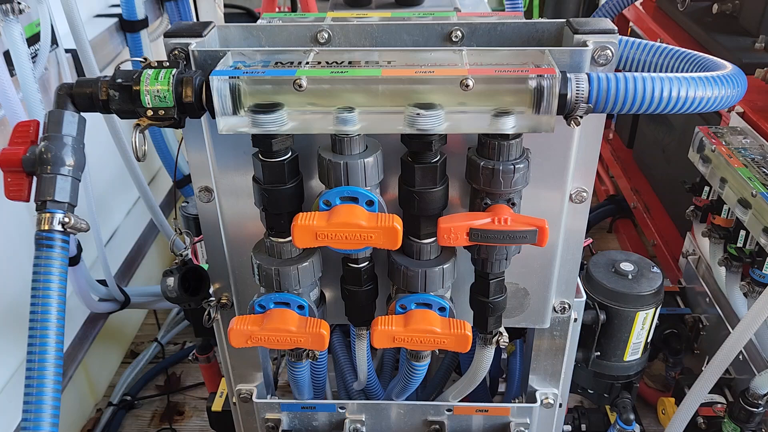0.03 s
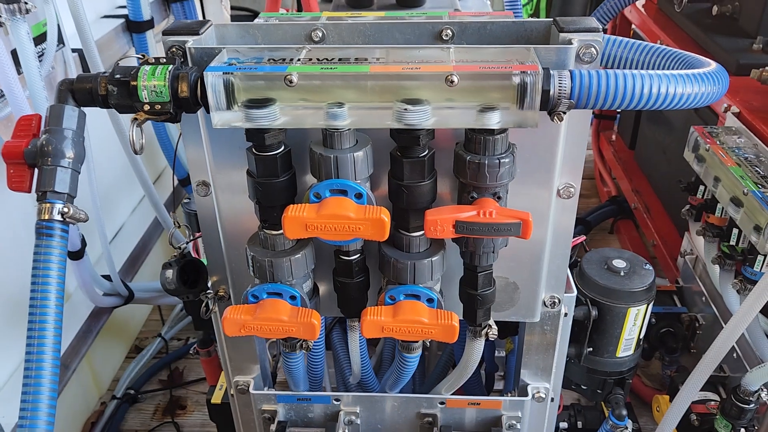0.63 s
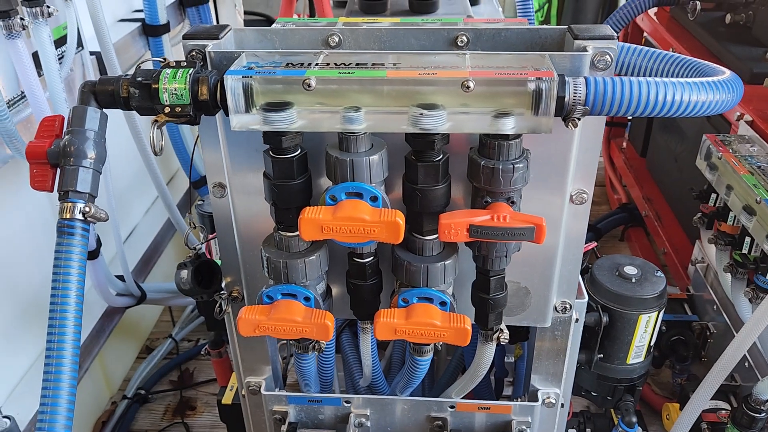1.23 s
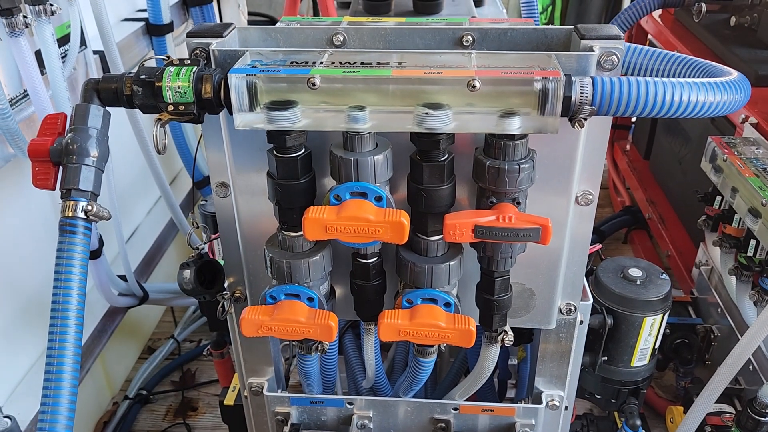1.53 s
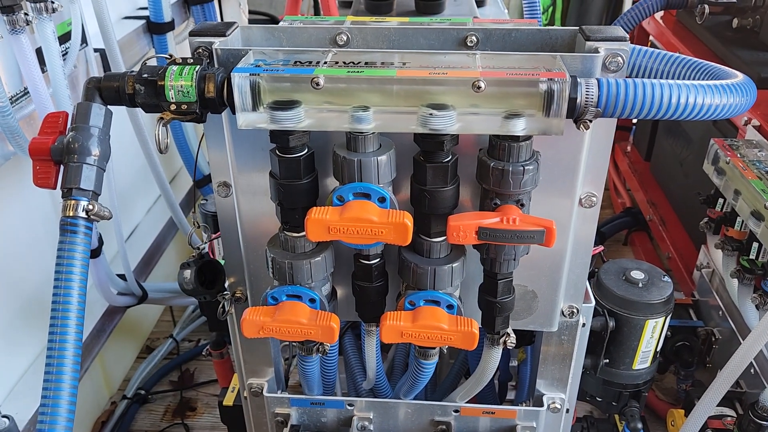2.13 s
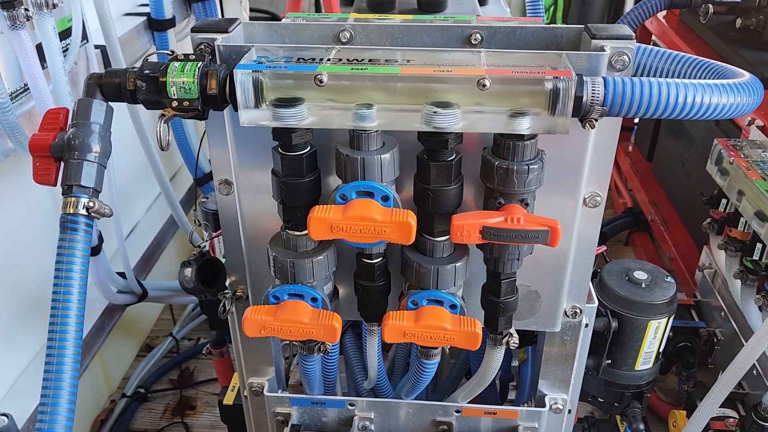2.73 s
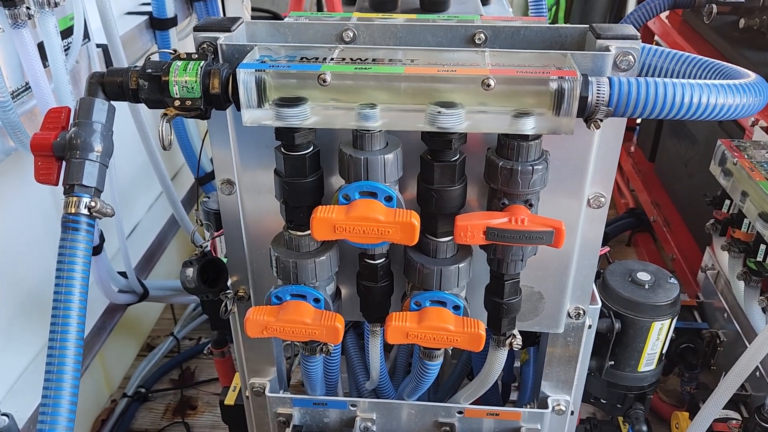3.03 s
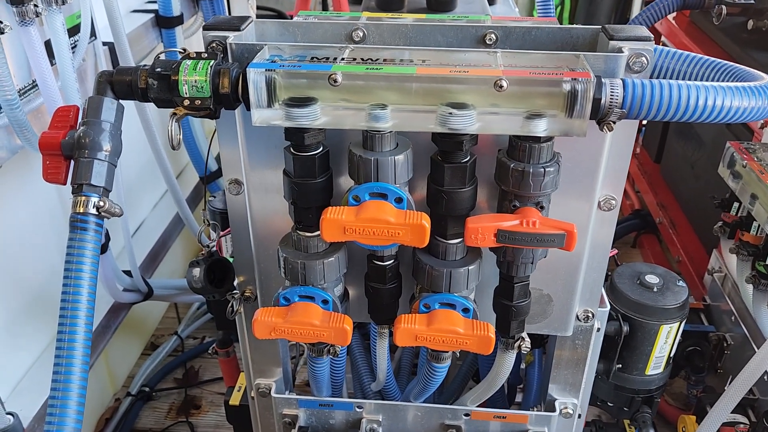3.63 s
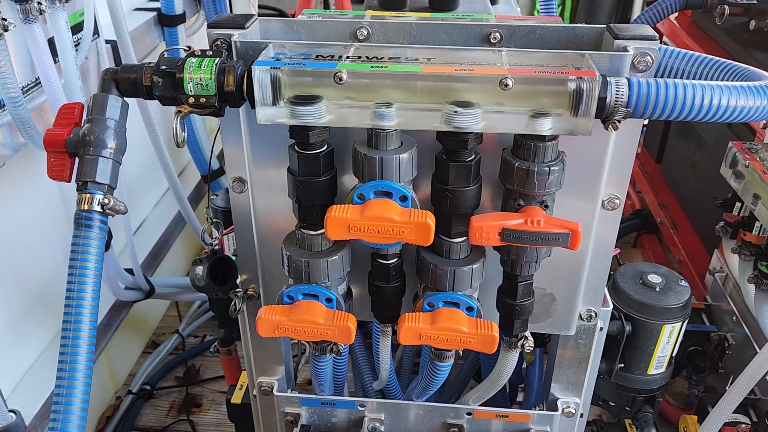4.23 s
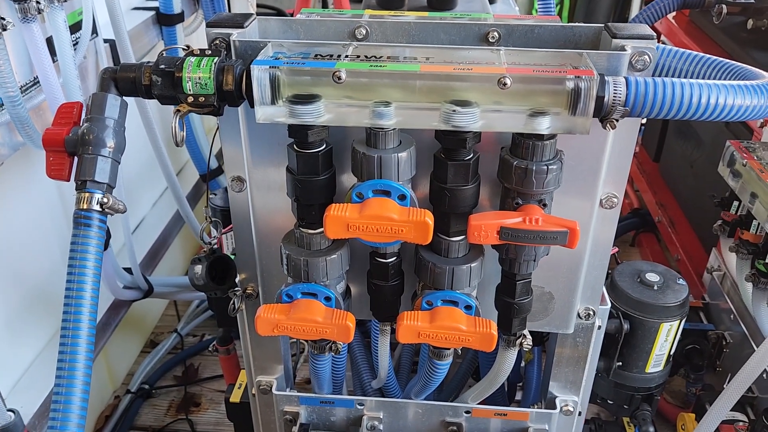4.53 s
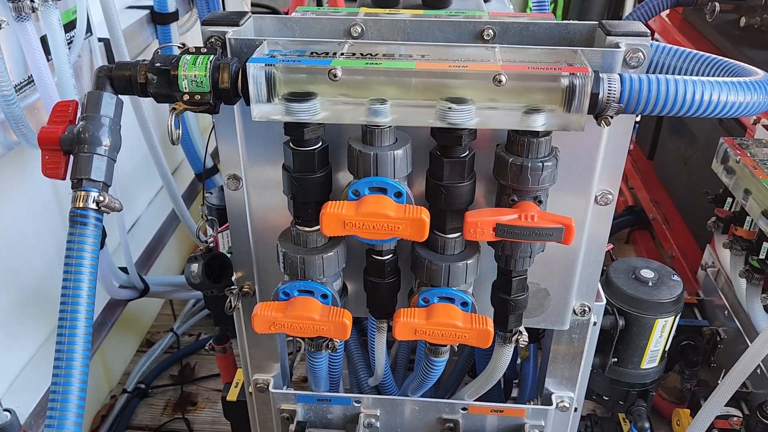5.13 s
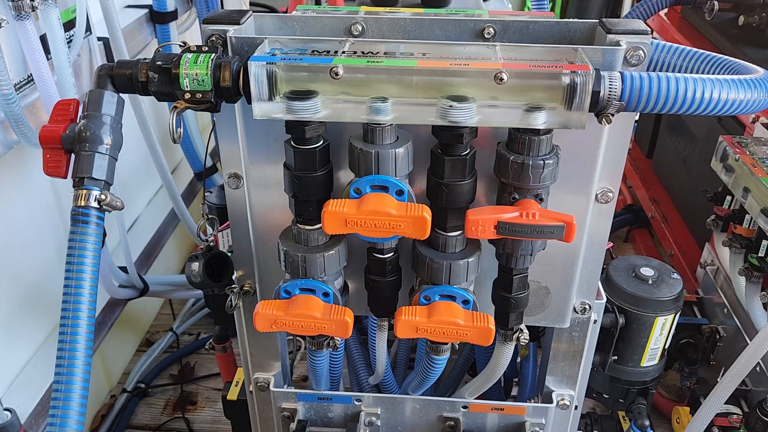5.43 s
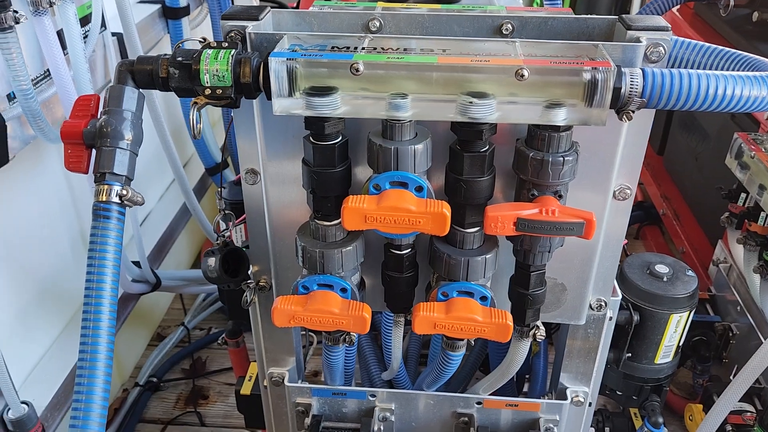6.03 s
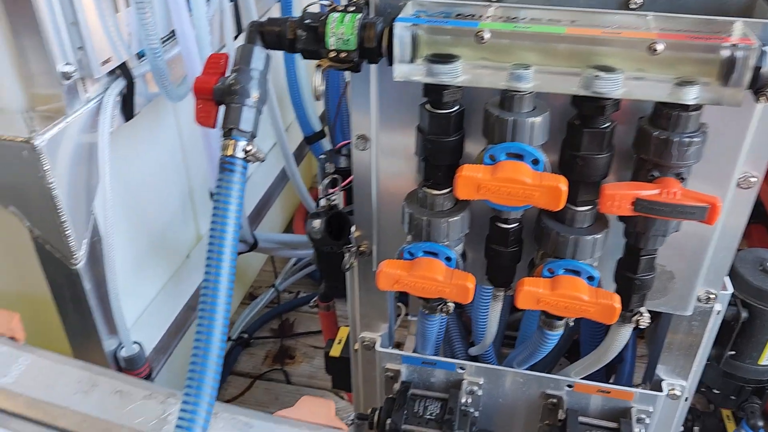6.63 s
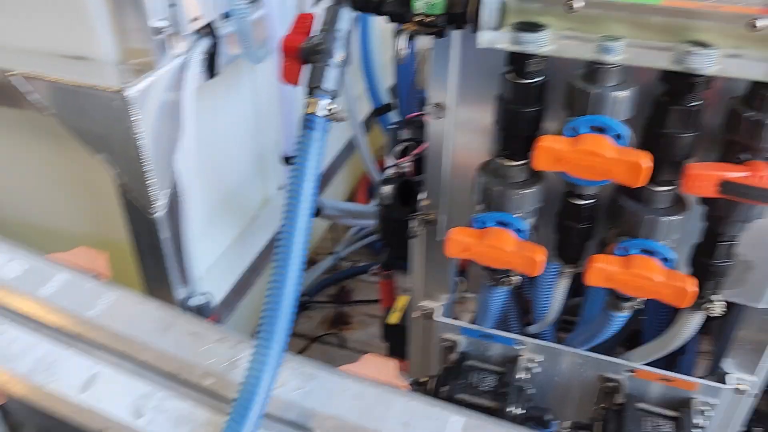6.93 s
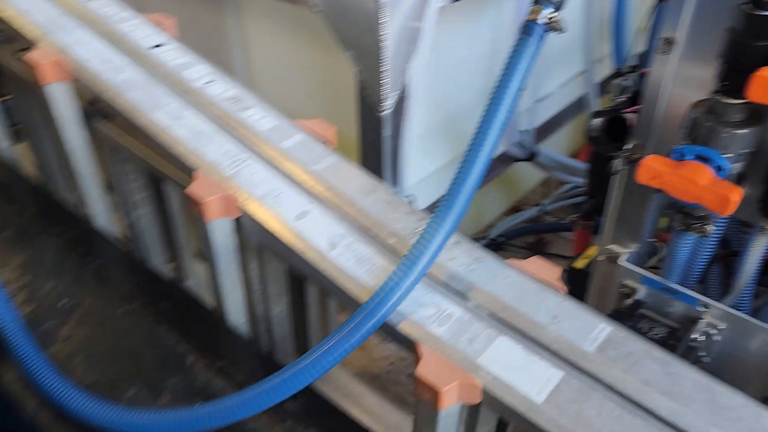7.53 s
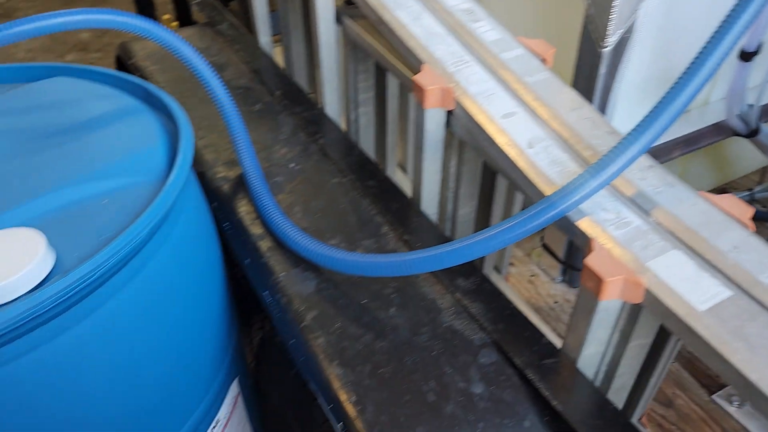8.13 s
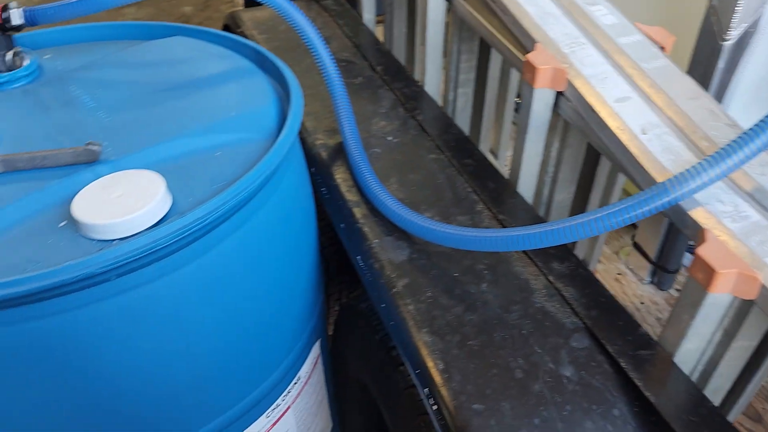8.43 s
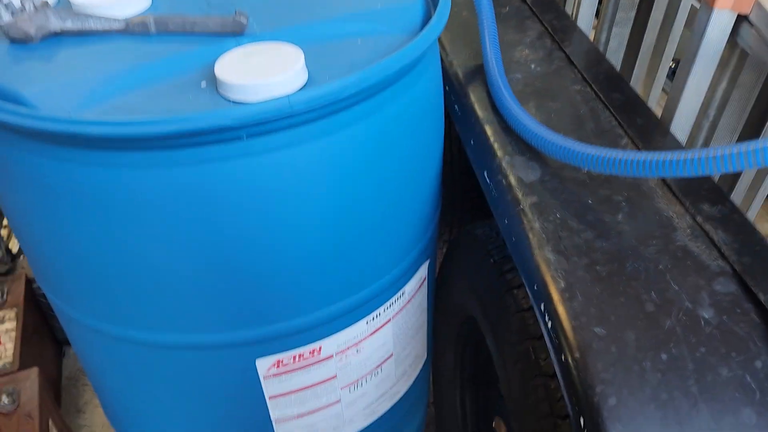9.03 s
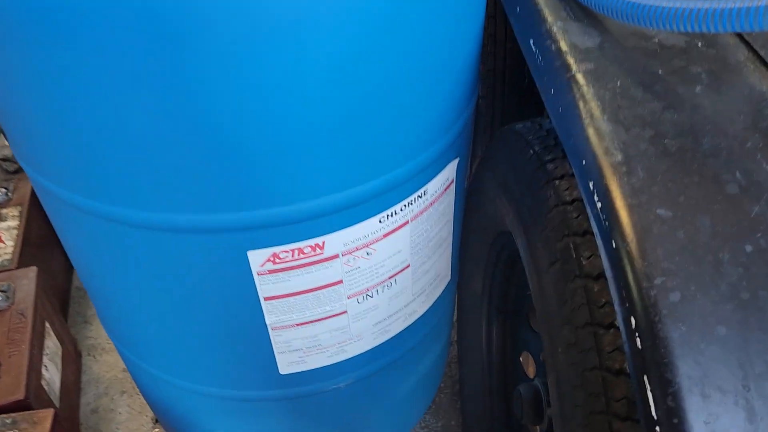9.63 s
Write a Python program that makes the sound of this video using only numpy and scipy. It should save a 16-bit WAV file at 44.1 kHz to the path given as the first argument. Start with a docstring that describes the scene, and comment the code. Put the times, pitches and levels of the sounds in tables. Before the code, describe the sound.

A small engine driving a transfer pump is heard from the very start, close by in a work trailer, and runs at one steady speed for about ten seconds. Its rapid firing makes a buzzing, throbbing drone, with a metallic casing rattle, quick light valve ticks and a thin high ring on top. A fine hiss pulses with it and the floor rumbles underneath. Little changes until about 6.5 seconds, when the microphone turns and moves a few steps away. The ticking softens, the ring fades out and the drone shifts in tone, with different midrange notes swelling and dipping, though it stays about as present. Between about 7.7 and 8.1 seconds, shoes make several short scuffs on the gritty floor. A slightly longer heel scrape follows around 9.5 seconds, with the engine still running to the end.

```python
"""A small four-stroke engine drives a transfer pump at steady speed in a chemical mixing trailer.
Its firings drone through exhaust and trailer resonances and shake the casing once a cycle.
Valve gear ticks and rings a thin cover, a fine sizzle pulses, and the floor rumbles.
The listener stands at the valve panel, then turns away and walks through standing waves to a drum,
shoes scuffing on the gritty floor."""
import sys
import numpy as np
from scipy import signal
from scipy.fft import rfft, irfft, next_fast_len
from scipy.io import wavfile
from scipy.ndimage import uniform_filter1d, map_coordinates

SR = 44100
rng = np.random.default_rng(int(sys.argv[2]) if len(sys.argv) > 2 else 0)


def dump_mix(stems):
    """Bounce the given channels to the path in sys.argv[1] as a 16-bit WAV at rate SR."""
    frames = np.atleast_2d(stems).T  # one column per channel
    limited = np.clip(frames, -1, 1)  # hard clip at full scale
    pcm = np.round(limited * 32767).astype(np.int16)
    wavfile.write(sys.argv[1], SR, pcm)


N = 435266
CYCLE_HZ = 32.903
TURN_M, DRUM_M = 0.96, 1.6  # from the panel: turn complete, drum


def amp(db):
    """Decibels to gain."""
    return 10 ** (np.asarray(db) / 20)


def unit(x):
    """x at rms 1."""
    return x / np.sqrt(np.mean(x ** 2) + 1e-20)


def bell(offset, half_width):
    """Gaussian of height 1, down to 1/e at half_width."""
    return np.exp(-(offset / half_width) ** 2)


def at_hz(points, hz):
    """(Hz, value) points interpolated on a log axis."""
    freqs, values = np.transpose(points)
    return np.interp(np.log(hz + 1), np.log(freqs + 1), values)


def timeline(points):
    """(seconds, value) points interpolated per sample."""
    times_s, values = np.transpose(points)
    return np.interp(np.arange(N) / SR, times_s, values)


def wobble(rate_hz):
    """Smooth random curve, rate_hz knots a second."""
    knots = rng.standard_normal(4096)
    return map_coordinates(knots, [np.arange(N) * rate_hz / SR], mode="wrap")


def filtered(x, response):
    """x through a frequency response."""
    size = next_fast_len(N + SR // 4)
    return irfft(rfft(x, size) * response(np.fft.rfftfreq(size, 1 / SR)), size)[..., :N]


# Each row: frequency in Hz, coherence between the ears.
EAR_COHERENCE = [(60, 0.98), (160, 0.99), (300, 0.95), (640, 0.87), (1400, 0.58), (3100, 0.037),
                 (7000, 0.029)]
def ears(pair, colour_db):
    """Two independent signals to coloured stereo at rms 1, coherent in the bass."""
    def response(hz):
        angle = np.arccos(np.clip(at_hz(EAR_COHERENCE, hz), -1, 1)) / 2
        return amp(colour_db(hz)) * [np.cos(angle), np.sin(angle)]
    mid, side = filtered(pair, response)
    return unit(np.array([mid + side, mid - side]))


def engine_cycles(wander=0.01094, hunt=0.0011, jitter=0.00018):
    """Cycles turned so far; speed wanders, hunts and varies per firing. Depths in cycles."""
    steady = CYCLE_HZ * np.arange(N) / SR
    return steady + wander * wobble(.7) + hunt * wobble(6) + jitter * wobble(CYCLE_HZ)


# Harmonics between resonances. Each row: frequency in Hz, level at the panel in dB.
OVERTONES = [(240, -67), (400, -61.5), (560, -61.5), (760, -65.5), (990, -62.5), (1090, -70), (1240, -64),
             (1480, -60), (1820, -67.5), (1950, -62.5), (2270, -63.5), (2500, -69.5), (3000, -68.5),
             (3650, -72)]
# Each row: frequency in Hz, fade of those harmonics in dB per m.
OVERTONE_FADE = [(350, 1.5), (700, -2), (1100, 1), (1600, 2), (2200, -1.5), (3300, -1.5)]
# Exhaust and trailer modes. Each row: centre in Hz, half width in Hz, panel level in dB, fade in dB/m.
DRONE_MODES = [(159.9, 19.5, -34.5, 4), (193.8, 15.6, -44.8, -0.5), (307.5, 22.4, -51.5, 0.5),
               (349, 24.2, -46, 5), (502.6, 34, -56.5, 3.5), (592, 17, -52, 3), (625.7, 25.4, -39, 9),
               (667.9, 32.8, -44, 6), (724, 15, -52.5, 7), (790, 18, -53.5, .5), (823, 16, -54, 14),
               (918, 52, -47.5, 7), (1009, 50, -56.5, 0), (1166.5, 32, -46.5, 8), (1349, 15, -56, 1),
               (1415, 14, -55, 6), (1490, 35, -57.5, 14), (1610, 24, -60, 2), (1710, 30, -53, 6),
               (2008, 42, -48, 13), (2105, 16, -56, 6), (2165, 34, -51, 5), (2745, 28, -61, 7),
               (2895, 14, -57.5, 7), (3060, 14, -61.5, 4), (3126, 14, -63, 8)]
# Standing-wave peaks. Each row: distance in m, half length in m, centre in Hz, half width in Hz,
# level in dB.
ANTINODES = [(.2, .24, 2310, 85, -54), (.3, .18, 1710, 25, -57), (.9, .4, 527, 18, -52.5),
             (2.35, .9, 527, 17, -48.5), (2.5, 2.1, 625, 15, -43.5), (2.3, .4, 658, 16, -53),
             (1.5, .9, 823, 18, -45.7), (2.2, 1.4, 855, 16, -53.5), (2.1, 1, 395, 20, -57),
             (1.4, 1.2, 1316, 20, -57), (2.4, .6, 1200, 60, -62), (1.5, .9, 2310, 90, -58),
             (1.3, .35, 2160, 34, -52.5), (1.95, .28, 2130, 28, -47.5), (2.35, .33, 2171, 21, -43.5),
             (1.4, .3, 2402, 18, -57), (2.4, .3, 2895, 23, -60), (1.3, .3, 3060, 18, -60),
             (1.55, .5, 3556, 22, -64.5)]
# Standing-wave dips. Each row: distance in m, half length in m, centre in Hz, half width in Hz,
# gain in dB.
NODES = [(.6, .35, 625, 20, -3.5), (1.5, .55, 724, 22, -13), (2, .25, 362, 20, -7),
         (1.35, .45, 1090, 25, -6), (1.45, .4, 1440, 75, -7), (1.5, .3, 2050, 60, -7),
         (1.75, .25, 2950, 400, -3)]
def harmonic_gains(hz, distance_m):
    """Resonances change with distance from the panel; standing waves add and cancel locally."""
    power = amp(at_hz(OVERTONES, hz) - at_hz(OVERTONE_FADE, hz) * distance_m) ** 2
    for centre_hz, half_hz, db, fade_db_per_m in DRONE_MODES:
        power += (amp(db - fade_db_per_m * distance_m) * bell(hz - centre_hz, half_hz)) ** 2
    for place_m, half_m, centre_hz, half_hz, db in ANTINODES:
        power += (amp(db) * bell(distance_m - place_m, half_m) * bell(hz - centre_hz, half_hz)) ** 2
    dips_db = sum(db * bell(distance_m - place_m, half_m) * bell(hz - centre_hz, half_hz)
                  for place_m, half_m, centre_hz, half_hz, db in NODES)
    return np.sqrt(power) * amp(dips_db)


# Target band envelopes at depth 1. Each row: low edge in Hz, high edge in Hz, peak time in cycles,
# swell in dB, knocks per cycle, knock time in cycles, knock in dB.
BAND_SWELLS = [(100, 240, .42, 2, 1, 0, 0), (240, 440, .55, 5, 2, .6, 1.5), (440, 570, .03, 3, 2, .02, 1.5),
               (570, 770, 0, 0, 2, .35, 1.2), (770, 1000, .2, 2.8, 3, .15, 1),
               (1000, 1280, .42, 3, 4, .28, .8), (1280, 1850, .5, 5.5, 7, .33, 1),
               (1850, 2450, .35, 2, 3, .15, 2.5), (2450, 3700, .35, 1.5, 3, .18, 3)]
def firing_phases(orders, start_phases, distance_m, depth, size=256, passes=60):
    """Walls smear each firing: phases are iterated so each band swells and knocks within the cycle."""
    hz, moment = orders * CYCLE_HZ, np.arange(size) / size
    gains, phases = harmonic_gains(hz, distance_m), start_phases.copy()
    for low_hz, high_hz, peak_at, swell_db, knocks, knock_at, knock_db in BAND_SWELLS:
        band = (hz >= low_hz) & (hz < high_hz)
        harmonics = np.exp(2j * np.pi * np.outer(orders[band], moment))
        envelope_db = swell_db * np.cos(2 * np.pi * (moment - peak_at))
        envelope_db += knock_db * np.cos(2 * np.pi * knocks * (moment - knock_at))
        for _ in range(passes):
            wave = (gains * np.exp(1j * phases))[band] @ harmonics
            target = amp(depth * envelope_db) * np.exp(1j * np.angle(wave))
            phases[band] = np.angle(harmonics.conj() @ target)
    return phases


# Each row: frequency in Hz, left minus right at the panel in dB.
PANEL_BALANCE = [(60, -4), (110, 5), (200, -1), (380, 4.5), (700, 3), (1290, -3.5), (2380, -7), (4400, 0.5),
                 (8120, -3), (15000, -0.5)]
# Each row: frequency in Hz, left minus right near the drum in dB.
DRUM_BALANCE = [(60, -9.5), (110, 7), (200, 0.5), (380, 0.5), (700, 0), (1290, 3), (2380, -9), (4400, 19),
                (8120, 0.5), (15000, -2.0)]
def ear_gains(hz, turned, lag_s=0.00035, lag_below_hz=1900):
    """Reflections split the ears' phases; after the turn low orders reach the right ear first."""
    ear = np.array([.5, -.5])[:, None, None]
    scatter_rad = np.arccos(np.clip(at_hz(EAR_COHERENCE, hz), 0, 1)) * rng.choice([-1, 1], len(hz))
    lag_rad = turned * 2 * np.pi * hz * lag_s / (1 + (hz / lag_below_hz) ** 2)
    balance_db = (1 - turned) * at_hz(PANEL_BALANCE, hz) + turned * at_hz(DRUM_BALANCE, hz)
    pair = amp(ear * balance_db) * np.exp(1j * ear * ((1 - 0.61 * turned) * scatter_rad - lag_rad))
    return pair / np.sqrt(np.mean(abs(pair) ** 2, axis=0))


def exhaust_drone(cycles, distance_m, turned, shudder=0.017, flutter_db=0.65,
                  drift_db=2.0, drift_rad=0.66, places=48, size=4096):
    """One firing a cycle: knocking at the panel, smoothed by reflections farther off."""
    orders = np.arange(4, 112)
    hz = orders * CYCLE_HZ
    grid_m = np.linspace(0, distance_m.max(), places)[:, None]
    grid_turned = np.minimum(grid_m / TURN_M, 1)
    near_rad = firing_phases(orders, 2 * np.pi * rng.random(len(orders)), distance_m=0, depth=0.99)
    far_rad = firing_phases(orders, near_rad, DRUM_M, depth=0.34)
    phases = near_rad + grid_turned * np.angle(np.exp(1j * (far_rad - near_rad)))
    drift = unit(uniform_filter1d(rng.standard_normal((2, places, len(orders))), size=12, axis=1))
    drift = drift * grid_turned * np.minimum(hz / 1400, 1)
    gains = harmonic_gains(hz, grid_m) * amp(drift_db * drift[0])
    spectra = np.zeros((2, places, size // 2 + 1), complex)
    spectra[..., orders] = gains * np.exp(1j * (phases + drift_rad * drift[1]))
    spectra[..., orders] *= ear_gains(hz, grid_turned)
    wavetables = irfft(spectra, size) * size / np.sqrt(2)  # one cycle per ear and place
    position = [distance_m / distance_m.max() * (places - 1), cycles % 1 * size]
    drone = np.array([map_coordinates(table, position, order=1, mode="nearest") for table in wavetables])
    upper = filtered(drone, lambda hz: 1 - 1 / (1 + (hz / 700) ** 8))
    flutter = amp(flutter_db * turned * wobble(22))
    return (drone + (flutter - 1) * upper) * (1 + shudder * wobble(45))


def cyclic_noise(cycles, size=8192):
    """Stereo noise that repeats exactly every engine cycle."""
    pattern = signal.resample(rng.standard_normal((2, round(SR / CYCLE_HZ))), size, axis=1)
    grid = np.arange(size) / size
    return unit(np.array([np.interp(cycles % 1, grid, row, period=1) for row in pattern]))


def blows(cycles, at, rise, decay, scatter_db):
    """Envelope of one blow a cycle, random in strength. Times in cycles."""
    since = cycles - at + 1
    age = since % 1
    strength = amp(scatter_db * rng.standard_normal(1024))
    return unit(strength[since.astype(int)] * (1 - np.exp(-age / rise)) * np.exp(-age / decay))


# Each row: frequency in Hz, relative noise density in dB.
CLATTER_SPECTRUM = [(100, -15), (250, -2.5), (470, -5), (800, -1.5), (1100, -3), (1500, 2), (1800, -1),
                    (2350, -4), (2600, -1), (3750, -5), (4600, -4), (6300, -3.5), (6750, -10), (8000, -3.5),
                    (9000, -12.5), (15800, -13)]
# Each row: frequency in Hz, repeating rattle over random rattle in dB.
REPEAT_RATIO = [(2300, -49), (2500, -5), (3400, -9.5), (3800, 2.5), (4400, 0.5), (6000, -2), (8000, -20),
                (14000, -19)]
# Each row: centre in Hz, width in Hz, lift in dB.
CASING_MODES = [(589, 170, 12.5), (930, 120, 1.5), (2135, 160, 7.5), (2990, 63, 4), (4300, 51, 2),
                (4540, 57, -3.5), (7170, 73, 9), (7530, 250, 5)]
def casing_clatter(cycles, turned, level_db=-44.5, shade_db=-4, bright_db=4, throb_db=1.0):
    """Combustion shakes the casing: part of the rattle repeats, part is new each cycle."""
    def colour_db(hz):
        lift_db = sum(db / (1 + (2 * (hz - centre_hz) / width_hz) ** 2)
                      for centre_hz, width_hz, db in CASING_MODES)
        return at_hz(CLATTER_SPECTRUM, hz) + lift_db
    angle = turned * np.pi / 2  # facing away, other reflections carry the rattle
    repeating = np.cos(angle) * cyclic_noise(cycles) + np.sin(angle) * cyclic_noise(cycles)
    repeating = filtered(repeating, lambda hz: amp(at_hz(REPEAT_RATIO, hz)))
    swell = 4 + blows(cycles, at=0.013, rise=0.3, decay=0.95, scatter_db=3.5)
    rattle = ears(swell * (repeating + rng.standard_normal((2, N))), colour_db)
    rattle = filtered(rattle, lambda hz: amp(np.array([[.5], [-.5]]) * at_hz(PANEL_BALANCE, hz)))
    # The body throbs at the panel and drops with the turn.
    body = filtered(rattle, lambda hz: 1 / (1 + (hz / 1900) ** 10))
    body_db = shade_db * turned + throb_db * (1 - turned) * np.cos(2 * np.pi * (cycles - .42))
    # A higher buzz swells early in the turn.
    buzz = filtered(rattle, lambda hz: bell(hz - 2260, 140))
    buzz_db = bright_db * bell(turned - .27, 0.11)
    return amp(level_db) * (rattle + (amp(body_db) - 1) * body + (amp(buzz_db) - 1) * buzz)


# Each row: frequency in Hz, relative noise density in dB.
TICK_SPECTRUM = [(1000, -20), (3000, 0), (3800, -28), (4250, -11), (4700, -21), (5200, -8), (6700, -7),
                 (7600, 3.5), (8700, -14), (15000, -16)]
def valve_ticks(cycles, distance_m, level_db=-51.0, shade_db=-8, shade_m=0.23, grain_db=2, repeat_db=-5):
    """Valve gear chatters once a cycle, partly alike each time; a step aside shades it."""
    grains = rng.standard_normal((2, N)) * amp(grain_db * wobble(1200))
    chatter = grains + amp(repeat_db) * cyclic_noise(cycles)
    ticks = blows(cycles, at=0.17, rise=0.086, decay=0.44, scatter_db=2.5) * chatter
    gain = amp(level_db + shade_db * np.minimum(distance_m / shade_m, 1))
    return gain * ears(ticks, lambda hz: at_hz(TICK_SPECTRUM, hz))


# Each row: tap time in cycles, relative strength in dB.
COVER_TAPS = [(.136, -3), (.26, 0), (.764, -2.5)]
# Each row: centre in Hz, width in Hz, relative gain in dB.
COVER_MODES = [(4210, 78, 4), (4550, 75, 1)]
# Each row: time in seconds, ring level in dB.
COVER_LEVEL = [(0, -61.5), (2.5, -57.5), (4.5, -56), (6.5, -57.5), (7.4, -65), (9.87, -92)]
def cover_ring(cycles, scatter_db=1.2, jitter_s=.000012):
    """Valve gear taps a thin metal cover at set points of the cycle and keeps it ringing."""
    def response(hz):
        return sum((-1) ** i * amp(db) * 1j * hz * width / (centre ** 2 - hz ** 2 + 1j * hz * width)
                   for i, (centre, width, db) in enumerate(COVER_MODES))
    taps, whole_cycles = np.zeros(N), np.arange(1, int(cycles[-1]) - 1)
    for at, db in COVER_TAPS:
        late, strength = rng.standard_normal((2, len(whole_cycles)))
        onsets = np.searchsorted(cycles, whole_cycles + at) + np.round(jitter_s * SR * late).astype(int)
        taps[onsets] += amp(db + scatter_db * strength)
    ear_db = np.array([[1], [-1]])
    return amp(timeline(COVER_LEVEL) + ear_db) * unit(filtered(taps, response))


# Each row: frequency in Hz, relative noise density in dB.
SIZZLE_SPECTRUM = [(2000, -2.5), (6000, -5), (9500, -4.5), (13000, -0.5), (15800, -0.5)]
def sizzle(cycles, level_db=-52.5, grain_db=2.5, flutter_db=1.5):
    """Fine high noise pulses with the engine, equally loud along the walk."""
    grains = rng.standard_normal((2, N)) * amp(grain_db * wobble(1500) + flutter_db * wobble(20))
    pulse = unit(1 + blows(cycles, at=0.079, rise=0.11, decay=0.37, scatter_db=3.0))
    return amp(level_db) * pulse * ears(grains, lambda hz: at_hz(SIZZLE_SPECTRUM, hz))


# Each row: frequency in Hz, relative noise density in dB.
RUMBLE_SPECTRUM = [(18, -7.5), (33, -1.5), (45, -5.5), (62, 1), (80, 1.5), (105, -4), (135, -8),
                   (180, -13.5), (260, -14), (450, -29), (900, -68)]
def floor_rumble(level_db=-44.0, sway_db=1.1, hum_hz=60, hum_db=-54):
    """The trailer floor rumbles unevenly over a low wavering hum."""
    noise = ears(rng.standard_normal((2, N)), lambda hz: at_hz(RUMBLE_SPECTRUM, hz))
    rumble = amp(level_db + sway_db * wobble(7)) * noise
    hum = np.sqrt(2) * np.sin(2 * np.pi * hum_hz * np.arange(N) / SR + .5 * wobble(3.2))
    return rumble + amp(hum_db) * hum


# Each row: centre in seconds, half length in seconds, then sole, grit and heel levels in dB.
SCUFFS = [(7.675, .012, -45, -45, -70), (7.695, .012, -48, -43, -70), (7.74, 0.033, -42, -45.5, -58),
          (7.94, 0.0067, -40, -43, -60), (7.97, 0.022, -45, -45, -60), (8.015, .025, -42, -48, -49),
          (8.061, 0.012, -36, -36, -57), (8.087, 0.018, -33.5, -43, -50), (9.45, 0.069, -44, -45.5, -44.5),
          (9.51, 0.04, -36, -55, -45)]
# Each row, in all three: frequency in Hz, relative noise density in dB.
SOLE_SPECTRUM = [(200, -28), (450, -18), (700, -21), (1200, -11), (1700, -3), (2250, 3.5), (3000, -5),
                 (4200, -9), (8000, -18), (15000, -37)]
GRIT_SPECTRUM = [(800, -31), (2500, -15), (6000, 4.5), (9500, 1.5), (12000, -2), (15500, -0.5)]
HEEL_SPECTRUM = [(200, -22), (450, -13), (700, 1.5), (1100, -7), (1700, -11), (4000, -33)]
def shoe_scuffs(grain_db=2.8):
    """Soles rasp on the floor and crush grit in dense grains; a dragged heel scrapes lower."""
    t = np.arange(N) / SR
    powers = sum(amp(levels_db)[:, None] ** 2 * bell(t - centre_s, half_s)
                 for centre_s, half_s, *levels_db in SCUFFS)
    scuffs = np.zeros((2, N))
    for power, spectrum in zip(powers, (SOLE_SPECTRUM, GRIT_SPECTRUM, HEEL_SPECTRUM)):
        grains = rng.standard_normal((2, N)) * amp(grain_db * wobble(1400))
        scuffs += np.sqrt(power) * ears(grains, lambda hz: at_hz(spectrum, hz))
    return scuffs


# Each row: time in seconds, listener's distance from the panel in m.
WALK = [(0, 0), (6.2, .04), (7.05, .2), (7.9, .95), (8.5, 1.4), (9.2, 1.85), (9.87, 2.45)]
def scene(metal_fade_db_per_m=1.75):
    """Engine, floor and shoes as heard along the walk."""
    cycles = engine_cycles()
    distance_m = timeline(WALK)
    turned = np.minimum(distance_m / TURN_M, 1)  # 0 facing the panel, 1 facing away
    metal = casing_clatter(cycles, turned) + valve_ticks(cycles, distance_m)
    metal *= amp(-metal_fade_db_per_m * distance_m)
    engine = exhaust_drone(cycles, distance_m, turned) + metal + cover_ring(cycles) + sizzle(cycles)
    return engine + floor_rumble() + shoe_scuffs()


# Each row: time in seconds, share of bass removed from 0 to 1.
BASS_CUT = [(.37, 1), (.41, 0)]
def record(dry, start_s=.1, bass_hz=100, top_hz=15830):
    """The sound cuts in at start_s, briefly thin in the bass, with nothing above top_hz."""
    opening_db = timeline([(start_s - .03, -68), (start_s - .004, -35), (start_s + .003, 0)])
    bass = filtered(dry, lambda hz: 1 / (1 + (hz / bass_hz) ** 2))
    thinned = dry - timeline(BASS_CUT) * bass
    return filtered(thinned * amp(opening_db), lambda hz: hz < top_hz)


dry = scene()
out = record(dry)
dump_mix(out)
```